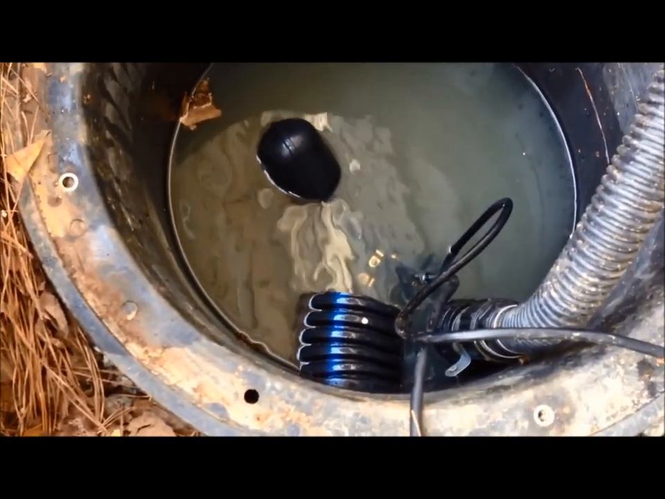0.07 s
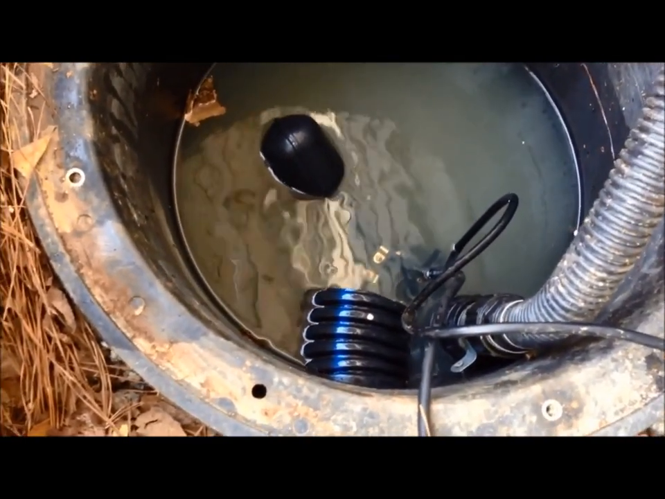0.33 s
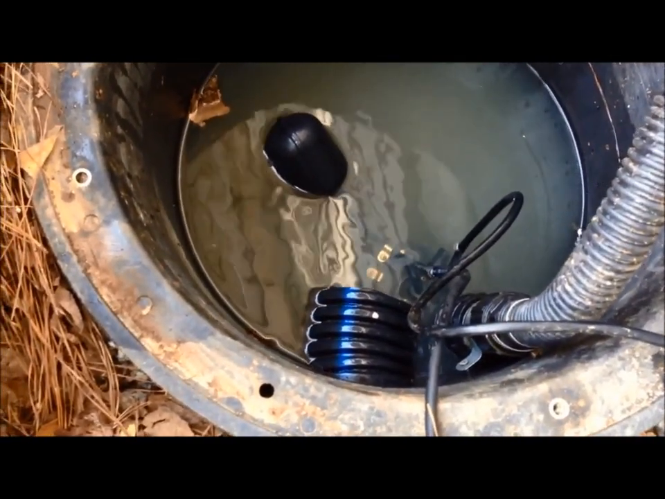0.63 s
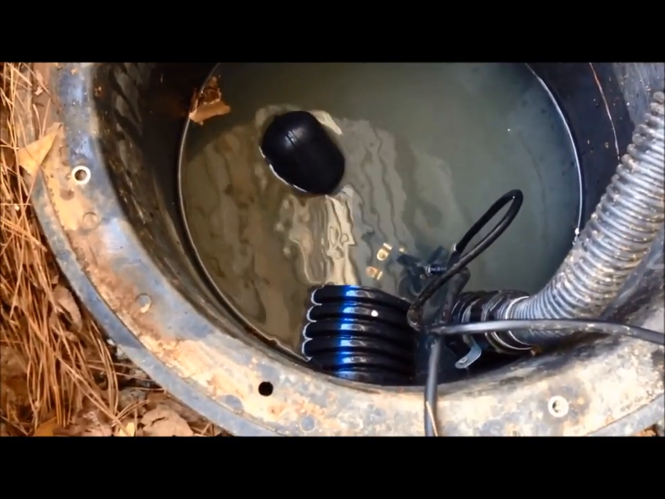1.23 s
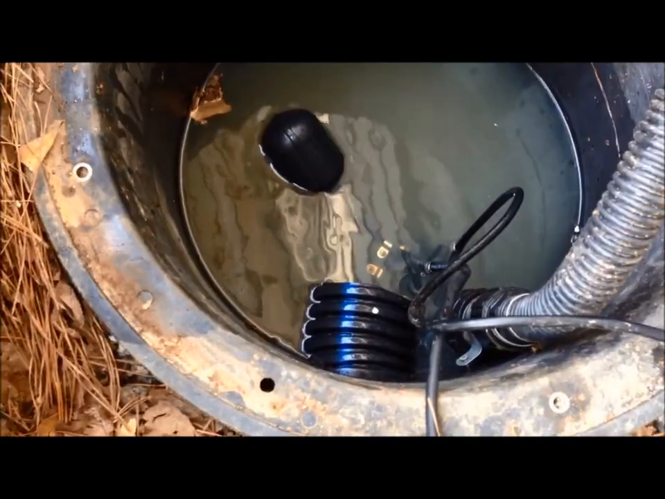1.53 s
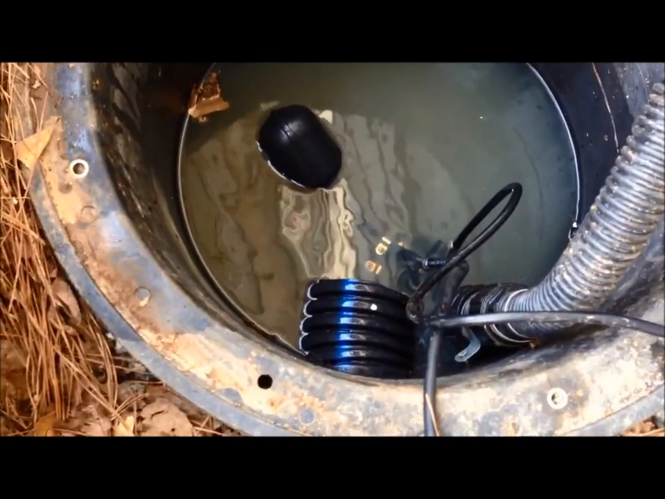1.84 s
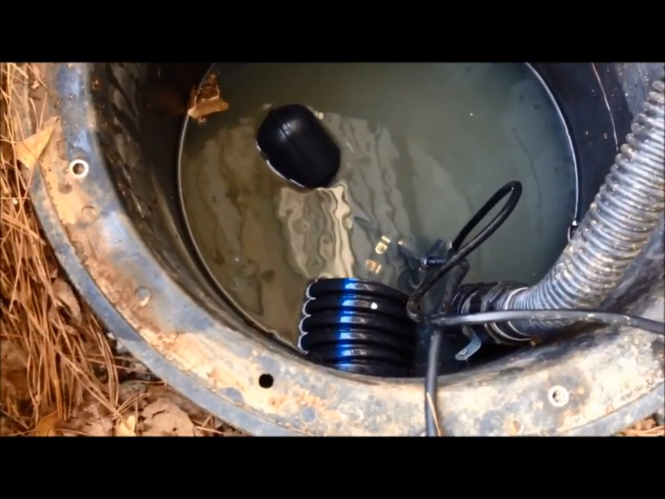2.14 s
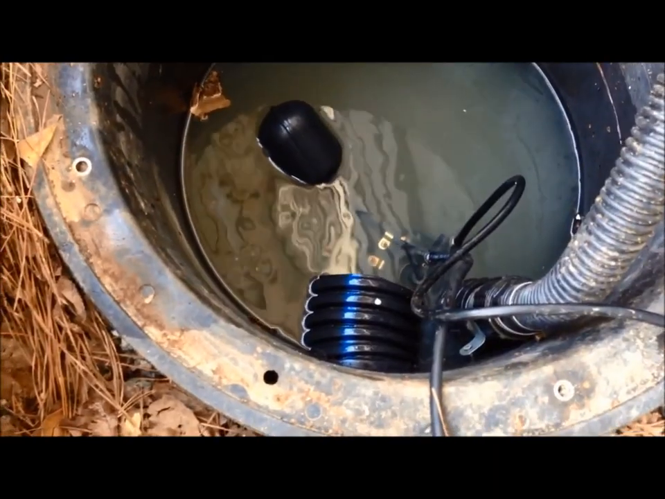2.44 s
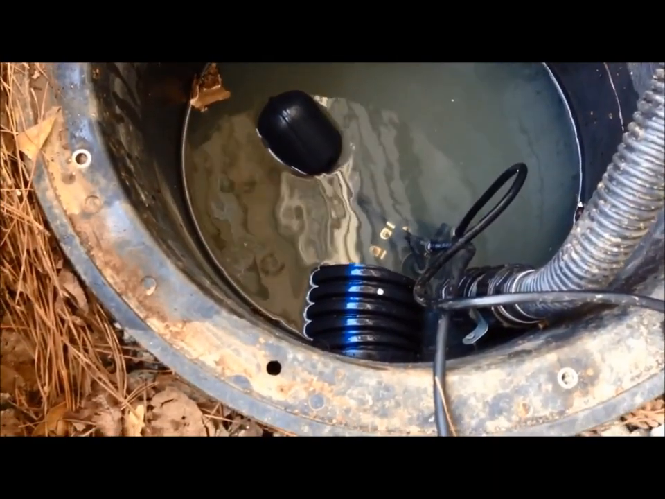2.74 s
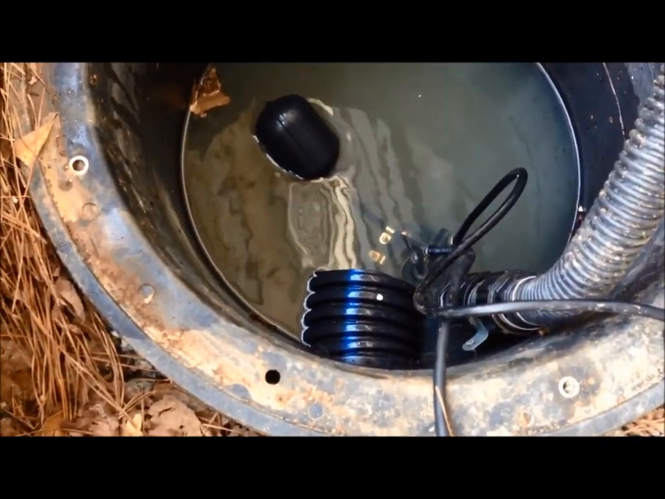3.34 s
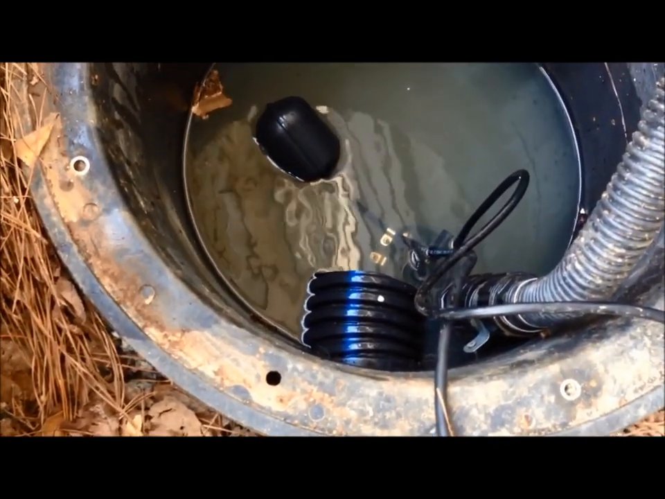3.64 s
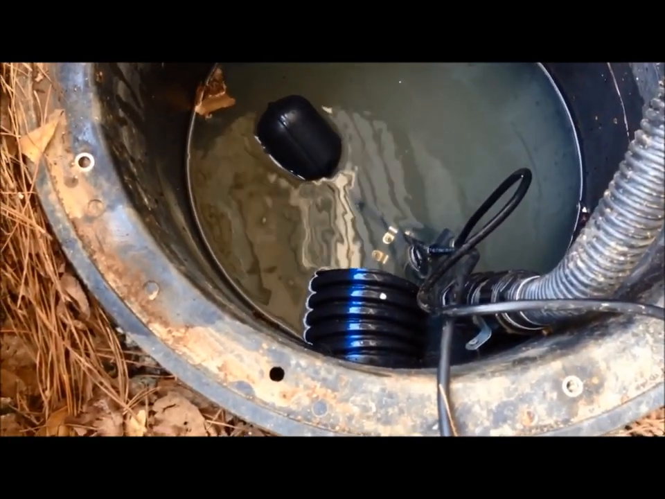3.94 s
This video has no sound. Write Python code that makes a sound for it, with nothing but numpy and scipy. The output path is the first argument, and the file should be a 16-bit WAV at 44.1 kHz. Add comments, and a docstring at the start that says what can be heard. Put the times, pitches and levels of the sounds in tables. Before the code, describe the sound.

A submerged pump hums at a steady low pitch for the whole four seconds, heard just above an outdoor basin. Water churns with it in a low rumble and soft, uneven booming thumps, thickest from about 1 to 3.4 seconds. Small bubbles tick at the surface, a little clearer near 0.4 and 1 second and sparser after 2 seconds, over a faint constant fizz and hiss.

```python
"""A submerged pump runs steadily in an outdoor basin of water, heard from just above the rim.
Its motor hums in harmonics of the shaft rate, strongest at twice that rate, with sidebands where
the mains field beats against the rotor. Water rushes through the pump; its churning thumps and
excites the basin's booming modes. Small bubbles tick and fizz at the surface over a faint hiss."""
import sys
import numpy as np
from scipy import signal
from scipy.fft import rfft, irfft
from scipy.io import wavfile

SR = 44100
rng = np.random.default_rng(int(sys.argv[2]) if len(sys.argv) > 2 else 0)


def bounce(signal):
    """Save signal as a 16-bit WAV file at the path given by the first command-line argument."""
    frames = np.transpose(np.atleast_2d(signal))
    limited = np.clip(frames, -1, 1)
    pcm = np.round(limited * 32767).astype(np.int16)
    wavfile.write(sys.argv[1], SR, pcm)


N = 176400
T = np.arange(N) / SR

# Rotation rate of the motor: time_s, shaft_hz
SHAFT_SPEED = [(0, 50.905), (.7, 50.91), (3.2, 50.965), (4, 50.95)]
# Strength of the churning: time_s, gain_db
CHURN_STRENGTH = [(0, -3.5), (.4, 2), (.72, -4), (1.05, 2.5), (1.75, -1), (2.1, -0.5), (2.3, 0.5),
                  (2.52, -1.5), (2.72, 0), (3.15, 0.5), (3.75, -0.5), (4, 0.5)]


def from_db(db):
    """Amplitude ratio: a factor of ten for every 20 dB."""
    return 10 ** (np.asarray(db) / 20)


def unit_rms(x):
    """Normalisation to a root-mean-square amplitude of one."""
    return x / np.sqrt(np.mean(x ** 2) + 1e-20)


def drift(corner_hz):
    """Low-pass filtered noise: a slow random wander with an rms of one."""
    hop = 100
    pole = np.exp(-2 * np.pi * corner_hz * hop / SR)
    slow = signal.lfilter([1], [1, -2 * pole, pole * pole], rng.standard_normal(N // hop + 1002))[1000:]
    return np.interp(np.arange(N) / hop, np.arange(len(slow)), unit_rms(slow))


def shaped_noise(spectrum):
    """Spectral shaping: noise of the given power density, silent beyond the ends of the table."""
    hz, db = np.transpose(spectrum)
    bin_hz = np.maximum(np.fft.rfftfreq(N, 1 / SR), 1)
    gain = from_db(np.interp(np.log(bin_hz), np.log(hz), db, left=-np.inf, right=-np.inf))
    return irfft(rfft(rng.standard_normal(N)) * gain, N) * np.sqrt(SR / 2)


def resonate(x, hz, width_hz):
    """Forced response of a damped oscillator, with a gain of one at resonance."""
    pole = np.exp(-np.pi * width_hz / SR)
    feedback = [1, -2 * pole * np.cos(2 * np.pi * hz / SR), pole * pole]
    return signal.lfilter(np.array([1, 0, -1]) * (1 - pole * pole) / 2, feedback, x + 1e-18)


def surface_hiss():
    """Amplitude modulation: each half octave of a faint hiss swells on its own as the surface moves."""
    # Spectrum of the hiss: frequency_hz, density_db_per_hz
    hiss_density = [(800, -106), (2000, -103), (2850, -102), (3020, -100), (3280, -101.5), (3560, -98),
                    (3780, -100.5), (4100, -99), (5000, -100.7), (6000, -102.3), (7200, -105), (9500, -108),
                    (15000, -109)]
    spectrum, hz = rfft(shaped_noise(hiss_density)), np.fft.rfftfreq(N, 1 / SR)
    edges_hz = 700 * 2 ** np.arange(0, 5.1, .5)
    out = np.zeros(N)
    for low, high in zip(edges_hz, edges_hz[1:]):
        band = irfft(spectrum * ((hz >= low) & (hz < high)), N)
        out += band * from_db(0.74 * drift(corner_hz=11))
    return out * from_db(0.35 * drift(corner_hz=5.3))


def bubble_fizz():
    """A Poisson process: tiny bubbles pop at random, each ringing briefly at one of twenty pitches."""
    pops_per_s, level_db, quality_factor = 110, -74.5, 28
    onsets = rng.random(N) < pops_per_s / SR
    strength_db = 6 * np.minimum(rng.exponential(1, N), 2)
    pops = onsets * from_db(strength_db) * rng.choice([-1, 1], N)
    pitches_hz = np.geomspace(2200, 5200, 20)
    pitch_index = rng.integers(0, len(pitches_hz), N)
    rings = (resonate(pops * (pitch_index == k), hz, hz / quality_factor)
             for k, hz in enumerate(pitches_hz))
    return from_db(level_db) * unit_rms(sum(rings))


def bubble_ticks():
    """Damped oscillation: a bursting bubble gives a rising ping and a noisy splash around its pitch."""
    # Bursting bubbles: start_s, level_db, pitch_hz
    bursts = [(0.046, -49, 970), (.099, -51, 2820), (0.117, -55, 2080), (0.379, -44, 1140),
              (.659, -51.5, 3990), (.712, -59, 8440), (.825, -61, 8000), (0.893, -51, 4260),
              (0.985, -57, 4500), (1, -42.5, 1270), (1, -55, 2740), (1.104, -54.5, 4170),
              (1.176, -46.5, 3500), (1.553, -51.5, 4330), (1.61, -52.5, 4500), (1.621, -53, 2980),
              (1.649, -52.5, 4100), (1.853, -53.5, 3770), (2.219, -54, 4330), (2.4, -52.5, 4000),
              (2.736, -53, 4030), (3.26, -53.5, 3190), (3.585, -52, 4500)]
    attack_s, decay_s, rise_per_s, splash_share = 0.0014, 0.0037, 3.8, 0.54
    out, t = np.zeros(N + SR), T[:SR // 20]
    envelope = (1 - np.exp(-t / attack_s)) ** 2 * np.exp(-t / decay_s)
    envelope /= envelope.max()
    for start_s, level_db, hz in bursts:
        ping = np.sin(2 * np.pi * hz * t * (1 + rise_per_s * t / 2))
        width_hz = 0.52 * hz
        band = resonate(rng.standard_normal(len(t)), hz, width_hz)
        splash = unit_rms(resonate(band, hz, width_hz))
        tick = (1 - splash_share) * ping + splash_share * splash
        start = int(start_s * SR)
        out[start:start + len(t)] += from_db(level_db) * envelope * tick
    return out[:N]


def churning():
    """Modal resonance: low turbulence and short pressure thumps both ring in the basin."""
    # Pressure pulses in the water: centre_s, peak_db
    pulses = [(0.0759, -24.5), (0.2538, -32), (0.333, -28.5), (.34, -33), (0.4583, -33), (0.598, -28),
              (1.0116, -24), (1.1072, -24), (1.214, -23.5), (1.301, -37), (1.4319, -24.5), (1.501, -37),
              (1.579, -26), (1.8432, -27.5), (1.9119, -28.5), (2.0405, -25.5), (2.0931, -26),
              (2.4116, -25.5), (2.4716, -23), (2.541, -28.5), (2.5813, -24.5), (2.8747, -28.5),
              (2.9307, -23), (3.0929, -26), (3.1424, -23), (3.266, -29), (3.349, -27.5), (3.3748, -31.5),
              (3.9061, -29)]
    # Modes of the basin: pitch_hz, width_hz, thump_gain_db, flow_level_db
    basin_modes = [(117.34, 3.35, 5.5, -44), (128.9, 2.5, -6, -49), (138, 10.4, -21.5, -57)]
    # Spectrum of the turbulence at a churning gain of 0 dB: frequency_hz, density_db_per_hz
    turbulence_density = [(10, -101), (24, -73), (42, -64.5), (70, -66.5), (95, -61), (140, -61.5),
                          (175, -73), (210, -70), (255, -82), (400, -92)]
    thump_hz, thump_width_s = 110.7, 0.0046
    thumps, boom = np.zeros(N), np.zeros(N)
    for centre_s, peak_db in pulses:
        t = T - centre_s
        envelope = np.exp(-.5 * (t / thump_width_s) ** 2)
        thumps -= from_db(peak_db) * envelope * np.cos(2 * np.pi * thump_hz * t)
    flow = shaped_noise(turbulence_density)
    for hz, width_hz, thump_gain_db, flow_level_db in basin_modes:
        boom += from_db(thump_gain_db) * resonate(thumps, hz, width_hz)
        steady_ring = resonate(rng.standard_normal(N + SR), hz, width_hz)[SR:]
        flow += from_db(flow_level_db) * unit_rms(steady_ring)
    swell_db = np.interp(T, *np.transpose(CHURN_STRENGTH)) + drift(corner_hz=7.6)
    return thumps + boom + flow * from_db(swell_db)


def pump_rush(angle):
    """Modulated flow noise: water in the pump pulses twice a turn and swells a little with the churning."""
    # Spectrum of the rush before modulation: frequency_hz, density_db_per_hz
    rush_density = [(200, -84), (280, -82.5), (370, -82.5), (455, -89.5), (520, -83.5), (600, -84),
                    (690, -96), (800, -89.5), (940, -96), (1060, -90.5), (1380, -97.5), (1580, -92),
                    (1740, -101), (2080, -102), (2350, -99.5), (2800, -106), (5000, -120)]
    churn_share, pulse_depth = 0.17, 0.39
    swell = from_db(churn_share * np.interp(T, *np.transpose(CHURN_STRENGTH)))
    return shaped_noise(rush_density) * swell * (1 + pulse_depth * np.cos(2 * angle))


def shaft_angle():
    """Phase as the integral of speed: the rotor's angle in radians."""
    zero_angle_s = 0.001003
    shaft_hz = np.interp(T, *np.transpose(SHAFT_SPEED))
    return 2 * np.pi * (np.cumsum(shaft_hz) / SR - zero_angle_s * shaft_hz[0])


def motor_hum(angle):
    """A harmonic series on the shaft rate, with sidebands as the mains field beats against the rotor."""
    # Harmonics of the shaft rate: order, level_db
    harmonics = [(2, -36), (4, -49), (6, -53), (8, -50.5), (9, -72), (10, -52.5), (11, -74.5), (12, -56.5),
                 (14, -75), (16, -62), (17, -82.5), (18, -68.5), (19, -78), (22, -69), (23, -83), (24, -75),
                 (26, -71.5), (28, -82), (30, -73), (31, -98), (32, -71.5), (34, -88.5), (36, -95),
                 (42, -82), (44, -90), (46, -78.5)]
    # Sidebands one beat frequency either side of a harmonic: order, below_db, above_db
    sidebands = [(2, -63, -51), (4, -70, -68), (6, -78, -65), (8, -69.5, -72), (10, -73, -70),
                 (12, -76, -76), (16, -74, -83), (20, -89, -68), (22, -83, -77), (30, -88, -84)]
    # Two faint tones outside the series: pitch_hz, level_db
    steady_tones = [(240, -68), (1157, -75)]
    field_hz, delay_s_per_hz = 120, 0.000012
    partial_waver_db, hum_waver_db = 0.48, 0.23
    out = sum(from_db(db) * np.sin(2 * np.pi * hz * T) for hz, db in steady_tones)
    for order, db in harmonics:
        # Dispersion: the housing passes high partials later than low ones.
        lag = np.pi * delay_s_per_hz * (order * SHAFT_SPEED[0][1]) ** 2
        out += from_db(db + partial_waver_db * drift(corner_hz=1.8)) * np.sin(order * angle - lag)
    beat_phase = 2 * np.pi * field_hz * T - 2 * angle
    for order, below_db, above_db in sidebands:
        for side, db in ((-1, below_db), (1, above_db)):
            out += from_db(db) * np.sin(order * angle + side * beat_phase + rng.uniform(0, 2 * np.pi))
    return np.sqrt(2) * out * from_db(hum_waver_db * drift(corner_hz=15))


def scene():
    """Superposition: the pressures of pump, water and bubbles add at one listening point."""
    angle = shaft_angle()
    pump = motor_hum(angle) + pump_rush(angle)
    return (pump + churning() + bubble_ticks() + bubble_fizz() + surface_hiss())[None]


def record(dry):
    """Band limiting: an elliptic low-pass filter cuts the highest treble steeply."""
    cutoff_hz = 15400
    return signal.sosfilt(signal.ellip(12, .1, 80, cutoff_hz, fs=SR, output="sos"), dry)


dry = scene()
out = record(dry)
bounce(out)
```